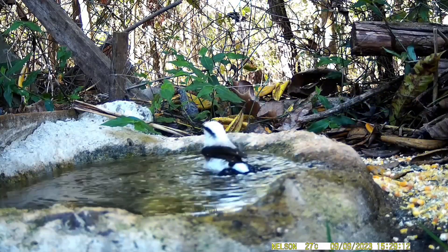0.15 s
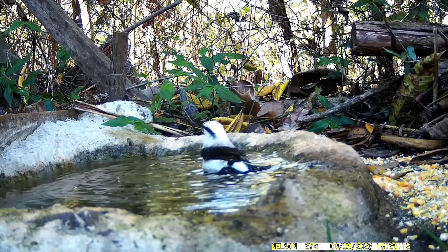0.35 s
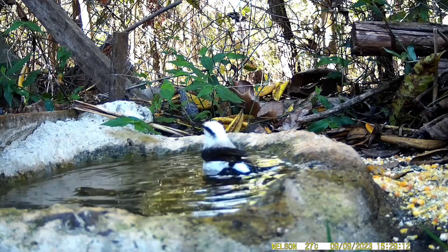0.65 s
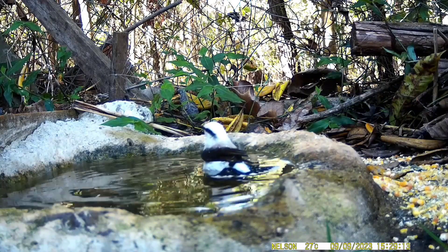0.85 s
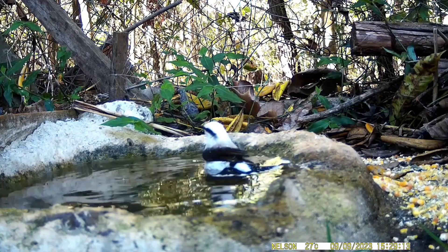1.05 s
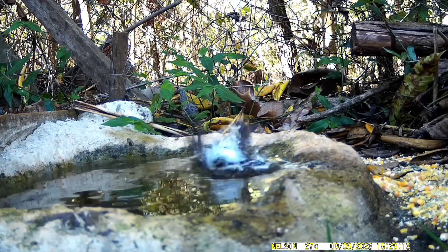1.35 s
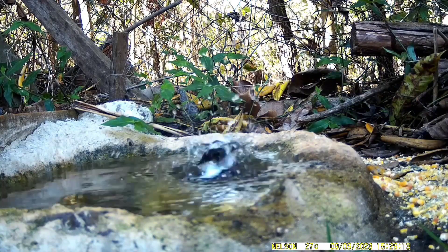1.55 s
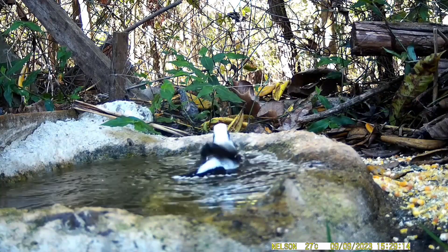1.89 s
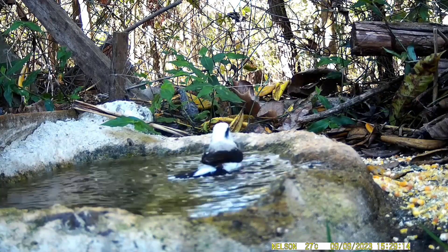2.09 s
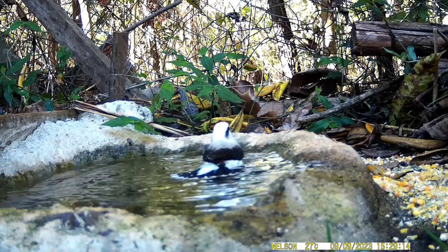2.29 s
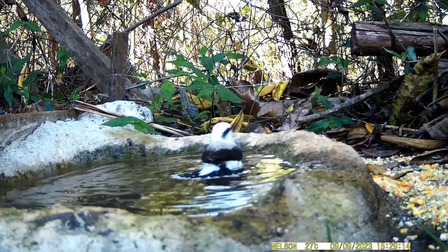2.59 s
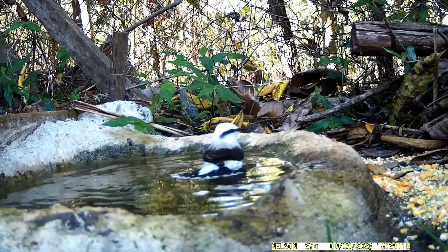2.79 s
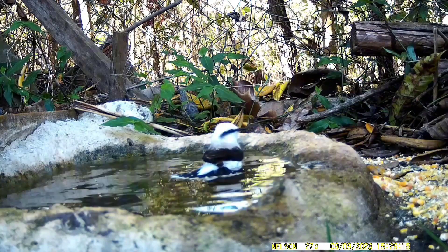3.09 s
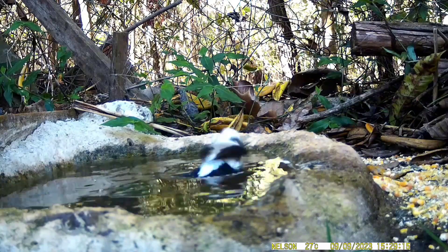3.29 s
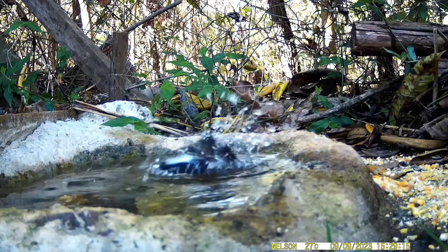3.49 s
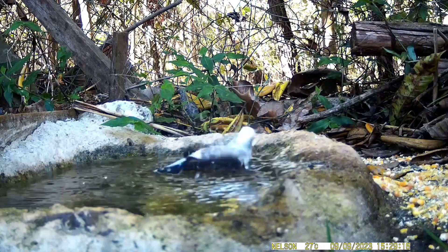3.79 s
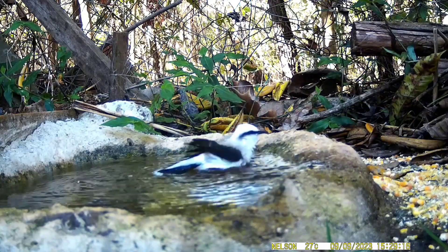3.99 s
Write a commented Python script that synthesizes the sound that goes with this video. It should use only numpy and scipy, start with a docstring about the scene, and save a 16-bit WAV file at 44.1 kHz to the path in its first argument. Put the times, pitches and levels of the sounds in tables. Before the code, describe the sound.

A small bird bathes in a shallow stone basin with two fluttering bursts of splashing, while another bird whistles and chirps in the trees.

```python
"""A shallow stone basin in a wood, heard from close by, over a low outdoor rumble, faint hiss and a far engine.
First come the last wing beats of one bathing bout and long whistles from a bird in the trees behind.
A full bout then throws spray, and drops smack back into the water; quick calls follow, growing louder.
A second full bout, among slow calls, ends in a louder, rounder flap as the bather rises. Basin and trees echo.
The engine hums ever higher until just before the end, where its pitch eases a little."""
import sys
import numpy as np
from scipy import signal
from scipy.fft import rfft, irfft, next_fast_len
from scipy.io import wavfile
from scipy.ndimage import map_coordinates

SR = 44100
rng = np.random.default_rng(int(sys.argv[2]) if len(sys.argv) > 2 else 0)


def digitize_waveform(pressure):
    """Quantize a signal to 16-bit integers and store it at the path in sys.argv[1].

    Rows of a 2-D input are taken as channels; values are limited to [-1, 1].
    """
    field = np.atleast_2d(pressure).T
    bounded = np.clip(field, -1, 1)
    quanta = np.round(bounded * 32767).astype(np.int16)
    wavfile.write(sys.argv[1], SR, quanta)


N = 182957  # length [samples]


def amp(db):
    """Decibels to gain."""
    return 10 ** (np.asarray(db) / 20)


def unit(x):
    """Scale to rms 1."""
    return x / np.sqrt(np.mean(x ** 2) + 1e-20)


def noise():
    """White noise of rms about 1."""
    return rng.standard_normal(N)


def along(points, hz):
    """Read (frequency [Hz], value) points on a log frequency axis."""
    f, v = np.transpose(points)
    return np.interp(np.log(hz + 1), np.log(f + 1), v)


def track(s, values):
    """One value per sample, joined by straight lines."""
    return np.interp(np.arange(N) / SR, s, values)


def wobble(rate, size=N):
    """A smooth random curve with the given number of knots a second."""
    knots = rng.standard_normal(int(size * rate / SR) + 4)
    return map_coordinates(knots, [np.arange(size) * rate / SR])


def colour(x, points):
    """Causal minimum-phase filter with the given spectrum; white noise keeps its power."""
    m = 2 * next_fast_len(N // 2 + SR // 4)
    gain = unit(amp(along(points, np.fft.rfftfreq(m, 1 / SR))))
    # folding the cepstrum onto positive times makes the filter causal
    cepstrum = irfft(np.log(gain + 1e-6), m)
    cepstrum[1:m // 2] *= 2
    cepstrum[m // 2 + 1:] = 0
    return irfft(rfft(x, m) * np.exp(rfft(cepstrum)), m)[:N]


def echo(x, decay, delay):
    """A diffuse tail of energy 1, after a delay [s], in which each frequency dies at its own speed."""
    hz, t, z = signal.stft(rng.standard_normal(SR // 2), SR, nperseg=128)
    fade = amp(-60 * t / along(decay, hz)[:, None])
    tail = signal.istft(z * fade, SR, nperseg=128)[1]
    tail = tail / np.linalg.norm(tail)
    return signal.fftconvolve(x, np.pad(tail, (int(delay * SR), 0)))[:N]


# Spectrum of the low outdoor rumble: (frequency [Hz], relative level [dB])
AIR_SPECTRUM = [(20, -3), (30, 3.5), (42, -3), (58, 7.5), (80, 1), (125, -6), (200, -11.5), (320, -16.5),
                (600, -21.5), (1200, -26), (2500, -36), (5000, -38.5)]
# Spectrum of the faint hiss: (frequency [Hz], relative level [dB])
HISS_SPECTRUM = [(500, -12.5), (1200, -14), (2500, -3.5), (3600, -2), (5000, -2.5), (6200, 0), (7800, -5.5),
                 (9400, -7), (9900, -12), (11000, -8), (15500, -13.5)]


def background(air_db=-58.0, hiss_db=-69.0):
    """Coloured noise: a low outdoor rumble of slightly drifting level and an even hiss."""
    rumble = amp(air_db + 0.79 * wobble(3.825)) * colour(noise(), AIR_SPECTRUM)
    return rumble + amp(hiss_db) * colour(noise(), HISS_SPECTRUM)


# The far engine: (time [s], firing rate before its small waver [Hz], level [dB])
ENGINE_COURSE = [(0.0, 85.33, -64.5), (0.85, 87.5, -64.5), (1.502, 90.5, -64.5), (2.25, 95.2, -57.5),
                 (3.1, 98, -55), (3.55, 99.6, -51.5), (3.8, 100.5, -53.5), (4.03, 104.4, -60),
                 (4.15, 102.5, -59.5)]
# Spectrum of its dull roar: (frequency [Hz], relative level [dB])
ROAR_SPECTRUM = [(60, 1), (150, -3), (300, -6), (700, -15.5), (1200, -16), (2500, -23), (5000, -46)]


def engine(octave_db=-21, roar_db=-10):
    """A far engine: its firing tone with a weak octave and a dull roar swell together."""
    s, hz, db = np.transpose(ENGINE_COURSE)
    firing_hz = track(s, hz) * (1 + 0.0069 * wobble(6.1))
    phase = 2 * np.pi * np.cumsum(firing_hz) / SR
    flicker = amp(1.45 * wobble(11))
    tone = flicker * np.sqrt(2) * (np.sin(phase) + amp(octave_db) * np.sin(2 * phase))
    roar = amp(roar_db) * colour(noise(), ROAR_SPECTRUM)
    return amp(track(s, db)) * (tone + roar)


def whistle(s, hz, db, overtone_db=-24, waver=0.012, flicker_db=2.0):
    """A nearly pure, slightly wavering tone with a weak octave."""
    at = np.arange(max(int(s[0] * SR), 0), min(int(s[-1] * SR), N))
    pitch_hz = np.interp(at / SR, s, hz) * (1 + waver * wobble(300, len(at)))
    phase = 2 * np.pi * np.cumsum(pitch_hz) / SR
    level = amp(np.interp(at / SR, s, db) + flicker_db * wobble(150, len(at)))
    tone = np.sin(phase) + amp(overtone_db) * np.sin(2 * phase)
    return np.bincount(at, level * tone, N)


def call(shape, s, db, slowness, pitch):
    """One note of the given shape, stretched and transposed, a little louder or softer every time."""
    t, hz, shape_db = np.transpose(shape)
    return whistle(s + slowness * t, pitch * hz, db + shape_db + rng.standard_normal())


# Long slurred whistles, one list each: (time [s], pitch before waver [Hz], level before the trees [dB])
LONG_WHISTLES = [
    [(0.0, 5942, -47.5), (0.035, 5920, -55), (0.048, 5010, -62), (0.056, 4420, -66)],
    [(0.27, 4270, -82), (0.295, 4790, -58.5), (0.315, 5350, -64), (0.325, 5970, -60.5), (0.35, 5700, -58),
     (0.372, 6030, -56), (0.385, 5850, -55), (0.391, 4810, -56.5), (0.398, 4550, -55.5), (0.412, 5210, -55),
     (0.432, 4900, -57), (0.448, 6020, -59), (0.475, 5750, -54), (0.5, 4580, -69)],
]
# A quick call leaps up, arches and falls, before stretching and transposing:
# (time from its upward flick [s], pitch [Hz], relative level [dB])
QUICK_SHAPE = [(-0.013, 4085, -22), (-0.008, 4297, -7.5), (-0.003, 4550, -4.5), (0.0005, 4840, 0),
               (0.003, 5507, -6), (0.008, 5694, -5), (0.016, 5380, -9.5), (0.02, 4454, -26),
               (0.024, 4100, -33)]
# The soft flick and low slur leading into a quick call, before transposing:
# (time from the call's flick [s], pitch [Hz], relative level [dB])
LEAD_SHAPE = [(-0.048, 4170, -36), (-0.043, 4620, -6.5), (-0.04, 5170, -7.5), (-0.037, 5520, -36),
              (-0.027, 3950, -16), (-0.012, 4160, -14.5)]
# A drawn-out call leaps up and holds its top, before stretching and transposing:
# (time from its upward flick [s], pitch [Hz], relative level [dB])
HELD_SHAPE = [(-0.012, 4050, -22), (-0.007, 4250, -9), (-0.002, 4550, -4), (0.001, 4850, -3),
              (0.003, 5560, -2), (0.008, 5620, -1), (0.016, 5350, -4), (0.02, 4450, -10),
              (0.023, 4150, -30)]
# Drawn-out calls: (time [s], level before scatter and trees [dB], slowness [factor], pitch [factor])
HELD_CALLS = [(1.129, -55, 1.6, 1.03), (1.300, -55.5, 1.3, 1.03), (1.740, -50.5, 1.35, 0.965),
              (3.689, -45, 1.75, 0.95), (3.867, -45.5, 1.6, 0.955), (4.131, -49, 1.48, 0.97)]


def songbird(pitch_scatter=0.0116, length_scatter=0.067, count=11):
    """A list of notes: long whistles, drawn-out calls and an even, growing series of quick calls with lead-ins."""
    start_s, gap_s = 1.867, 0.1385
    start_db, growth_db_per_s = -53.2, 3
    notes = [whistle(*np.transpose(rows)) for rows in LONG_WHISTLES]
    notes += [call(HELD_SHAPE, *row) for row in HELD_CALLS]
    for since in gap_s * np.arange(count):
        s, db = start_s + since, start_db + growth_db_per_s * since
        pitch = 0.96 * rng.normal(1, pitch_scatter)
        slowness = 0.92 * rng.normal(1, length_scatter)
        lead = call(LEAD_SHAPE, s, db, 1, pitch)
        notes.append(lead + call(QUICK_SHAPE, s, db, slowness, pitch))
    return notes


# How long the woods ring: (frequency [Hz], time to fall by 60 dB [s])
WOODS_DECAY = [(500, 0.74), (5000, 0.62), (12000, 0.21)]


def through_trees(note, direct_db=-3.0, leaves_db=-7, woods_db=-5.5):
    """Near trunks and leaves blur a note and the woods answer it, a little differently each time."""
    leaves = echo(note, [(5000, 0.088)], delay=0.0014)
    near = amp(direct_db) * note + amp(leaves_db) * leaves
    return near + amp(woods_db) * echo(near, WOODS_DECAY, delay=0.008)


# Runs of even wing strokes; a full bout has slower ones as the bird ducks, then it shakes faster:
# (first stroke [s], end [s], stroke rate [strokes/s])
STROKE_RUNS = [(0.001, 0.065, 22.5), (1.323, 1.525, 21.7), (1.532, 1.92, 24.55), (3.334, 3.54, 21.5),
               (3.544, 3.97, 24.85)]


def stroke_times():
    """When the wings come down [s]."""
    return np.concatenate([np.arange(start, end, 1 / rate) for start, end, rate in STROKE_RUNS])


# How hard the wings hit the water, one curve per bout: (time [s], level before each layer's gain [dB])
BOUT_EFFORT = [
    [(0.0, -52.5), (0.06, -56.5), (0.18, -68)],
    [(1.3, -58), (1.375, -42), (1.46, -41.5), (1.53, -42.5), (1.615, -51.5), (1.69, -48.5), (1.86, -55.5),
     (1.96, -62)],
    [(3.3, -55.5), (3.38, -42), (3.5, -41.5), (3.58, -44.5), (3.64, -48.5), (3.87, -47), (3.95, -54.5),
     (3.99, -60)],
]


def effort(s):
    """The bird's effort [dB] at the given times; practically nothing between bouts."""
    curves = [np.interp(s, *np.transpose(bout), left=-140, right=-140) for bout in BOUT_EFFORT]
    return np.max(curves, axis=0)


def pushes(times, db, attack, t60, hold=0.0084):
    """Strokes rise quickly, hold while the wing is in the water and die away (all in s); their powers add."""
    t = np.arange(SR // 2) / SR
    shape = (1 - np.exp(-t / attack)) * amp(-60 * np.maximum(t - hold, 0) / t60)
    power = np.bincount(np.round(times * SR).astype(int), amp(db) ** 2, N)[:N]
    return np.sqrt(np.abs(signal.fftconvolve(power, shape ** 2)[:N]))


# Spectrum of the air from each stroke: (frequency [Hz], relative level [dB])
PUFF_SPECTRUM = [(60, -20), (130, 0), (190, -3.5), (300, -9), (500, -10), (1000, -23.5), (3000, -46)]
# Spectrum of the last flap: (frequency [Hz], relative level [dB])
THUMP_SPECTRUM = [(70, -14), (130, -3.5), (190, 3), (250, -5.5), (340, -16.5), (600, -13.5), (2000, -45)]


def wings(puff_db=-61.5, attack=0.0027, t60=0.26):
    """Wet wings push air in a soft, low puff at every stroke, and in a louder thump as the bird rises."""
    times = stroke_times()
    puffs = pushes(times, np.full(len(times), puff_db), attack, t60)
    flap_s, flap_width_s, flap_db = 3.92, 0.062, -55
    flap = amp(flap_db) * np.exp(-((np.arange(N) / SR - flap_s) / flap_width_s) ** 2)
    return puffs * colour(noise(), PUFF_SPECTRUM) + flap * colour(noise(), THUMP_SPECTRUM)


def plinks(s, peak, hz, swell, rise, size, order):
    """Tiny bubbles: each swells (gentler at a higher order), rings for a few cycles at a rising pitch and dies."""
    t = np.arange(size) / SR
    u = t / swell[:, None]
    bend = 1 + rise * (np.tanh(u / 2) - 1)
    phase = hz[:, None] * t * bend + rng.random((len(s), 1))  # in cycles
    envelope = peak[:, None] * (u * np.exp(1 - u)) ** order
    waves = envelope * np.sin(2 * np.pi * phase)
    at = np.round(np.abs(s) * SR).astype(int)[:, None] + np.arange(size)
    return np.bincount(at.ravel(), waves.ravel(), N)[:N]


def droplets(low_hz, high_hz, cycles, spread_db, count, size):
    """A steady stream of bubbles of uneven size and pitch, rms 1."""
    when, pitch, weight, life = rng.random((count, 4)).T
    hz = low_hz + (high_hz - low_hz) * pitch
    swell = cycles * 2 ** (2 * life - 1) / hz
    peak = amp(spread_db * weight ** 3) / np.sqrt(swell)  # most are small, a few are large
    return unit(plinks(when * N / SR, peak, hz, swell, rise=0.21, size=size, order=3))


# Spectrum of the fine droplets: (frequency [Hz], relative level [dB])
SPRAY_SPECTRUM = [(2000, -20.5), (3300, -43), (4200, -12.5), (5000, 0), (6800, 0), (7700, -5.5),
                  (9400, -7.5), (9750, -18.5), (10900, -11.5), (12300, -19), (12700, -22), (15800, -34)]
# Spectrum of the churned water: (frequency [Hz], relative level [dB])
SLOSH_SPECTRUM = [(200, -22), (500, -11), (850, -7.5), (1500, -1), (2300, -3), (3100, -7.5), (3800, -5.5),
                  (5000, 2.5), (8000, -41)]


def strokes(slosh_db=-13, spray_db=-2, patter_db=-15, slosh_t60=0.13, slosh_grows=0.76):
    """Each stroke churns the water into larger bubbles and flings dense spray, which rains back as sparser ticks."""
    attack_s, spray_t60_s, fall_s = 0.0052, 0.09, 0.013  # fall_s: flight time of the spray
    times = stroke_times()
    db = effort(times) + 0.54 * rng.standard_normal(len(times))  # strokes differ slightly
    usual = np.median(db)
    churn_db = usual + slosh_grows * (db - usual) + slosh_db
    spray = pushes(times, db + spray_db, attack_s, spray_t60_s)
    slosh = pushes(times, churn_db, attack_s, slosh_t60)
    patter = amp(effort(np.arange(N) / SR - fall_s) + patter_db)
    fine = droplets(3000, 16240, cycles=2.47, spread_db=18.5, count=18000, size=180)
    ticks = droplets(3550, 12970, cycles=2.65, spread_db=2, count=3500, size=180)
    bubbles = droplets(583.0, 5180, cycles=1.42, spread_db=11.0, count=5500, size=500)
    churn = (bubbles + 0.67 * noise()) * np.hypot(slosh, 0.23 * patter)
    return colour(fine * spray + ticks * patter, SPRAY_SPECTRUM) + colour(churn, SLOSH_SPECTRUM)


def stroke_drops(over_db=11, scatter_db=1.0, flight_s=0.014, centre_hz=6000, pitch_spread=0.074, count=2):
    """Every stroke also throws further drops that land just after it: (time [s], level [dB], pitch [Hz])."""
    s = np.repeat(stroke_times(), count)
    size, pitch = rng.standard_normal((len(s), 2)).T
    landing = s + flight_s * rng.random(len(s))
    db = effort(s) + over_db + scatter_db * size
    return np.column_stack([landing, db, centre_hz * np.exp(pitch_spread * pitch)])


# Drops placed one by one, loud and soft; deep ones trap a large, low bubble:
# (time [s], level before each layer's gain [dB], bubble pitch [Hz])
PLACED_DROPS = [(1.3715, -28, 6320), (1.3814, -28, 6100), (1.4082, -22.5, 6000), (1.4263, -19.5, 5500),
                (1.4467, -24, 6000), (1.4646, -35, 5800), (1.512, -18.5, 5730), (1.5164, -29.5, 2070),
                (1.5346, -14.5, 6630), (1.5365, -36, 2350), (1.5388, -20, 4800), (1.5618, -33.5, 2330),
                (1.5709, -24.5, 7300), (1.5754, -22.5, 5560), (1.5875, -25.5, 8300), (1.6508, -36, 6510),
                (1.6761, -25.5, 5700), (1.7495, -30, 5870), (1.7765, -35, 6100), (1.8592, -39, 6340),
                (1.9026, -39, 5700), (1.9499, -36.5, 8300), (3.3412, -46, 5070), (3.4183, -42, 2400),
                (3.4244, -39, 5800), (3.4364, -43, 5660), (3.4764, -28, 6580), (3.4841, -33, 6010),
                (3.4975, -20.5, 5850), (3.5538, -28, 4270), (3.554, -32.5, 2660), (3.58, -20.5, 6100),
                (3.5801, -37.5, 2500), (3.5841, -28, 5800), (3.5909, -25.5, 5530), (3.6113, -16.5, 6720),
                (3.6142, -26.5, 5600), (3.7468, -30, 6000), (3.7632, -32, 5827), (3.8709, -35, 6300)]
# Spectrum of the broad splat: (frequency [Hz], relative level [dB])
SPLAT_SPECTRUM = [(300, -17.5), (900, -15.5), (1600, -1), (2600, -3.5), (4200, -1.5), (7000, 4.5),
                  (9500, -15), (15000, -27)]


def drops(ring_db=-2.17, smack_db=-6, splat_db=-23, splat_t60=0.017):
    """A drop smacks the surface, traps a bubble that rings very briefly and leaves a short, broad splat of noise."""
    s, db, hz = np.vstack([PLACED_DROPS, stroke_drops()]).T
    swell = 1.33 / hz  # the bubble swells for 1.33 cycles
    ring = plinks(s, amp(db + ring_db), hz, swell, rise=0.032, size=300, order=1)
    hits = np.bincount(np.round((s + swell / 2) * SR).astype(int), amp(db), N)[:N]
    fade = amp(-60 * np.arange(SR // 10) / SR / splat_t60)
    splats = signal.fftconvolve(hits, fade)[:N] * noise()
    smack = amp(smack_db) * colour(hits, SPRAY_SPECTRUM)
    return ring + smack + amp(splat_db) * colour(splats, SPLAT_SPECTRUM)


def scene(basin_db=-8.0, woods_db=-24):
    """The near basin answers the splashes almost at once, the trees later and faintly."""
    water = strokes() + drops()
    basin = amp(basin_db) * echo(water, [(1000, 0.038), (8000, 0.024)], delay=0.0007)
    trees = amp(woods_db) * echo(water, WOODS_DECAY, delay=0.01)
    song = sum(through_trees(note) for note in songbird())
    return (background() + engine() + song + wings() + water + basin + trees)[None]


def record(dry):
    """Band-limit the finished sound: nothing is kept above top_hz."""
    top_hz = 15830
    m = next_fast_len(N + SR // 2)
    kept = np.fft.rfftfreq(m, 1 / SR) < top_hz
    return irfft(rfft(dry, m) * kept, m)[..., :N]


dry = scene()
out = record(dry)
digitize_waveform(out)
```